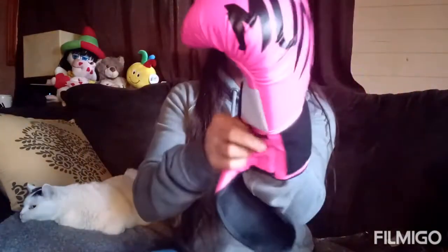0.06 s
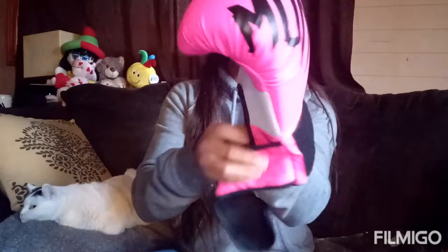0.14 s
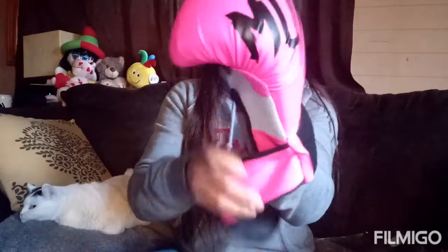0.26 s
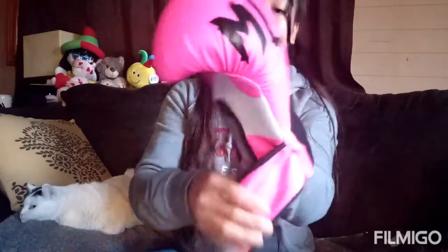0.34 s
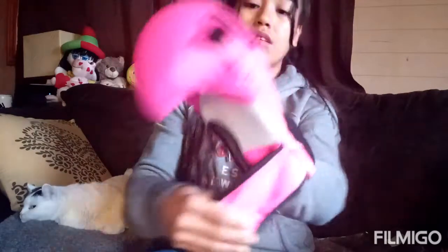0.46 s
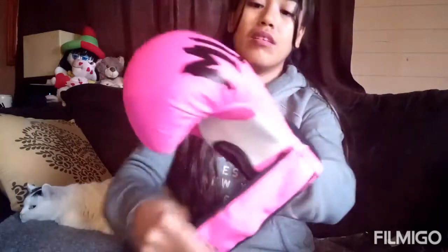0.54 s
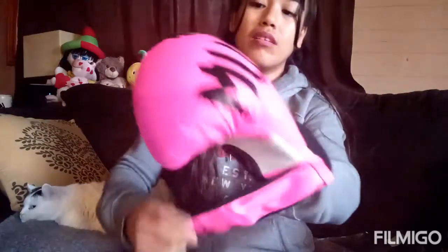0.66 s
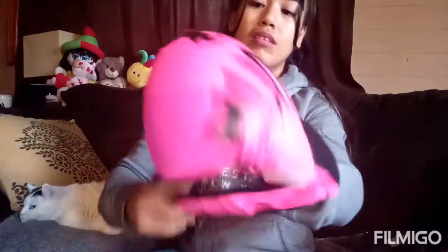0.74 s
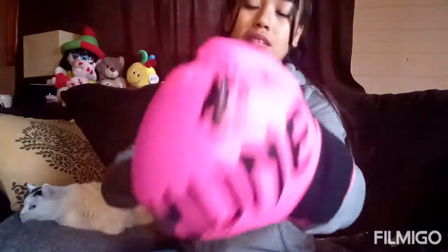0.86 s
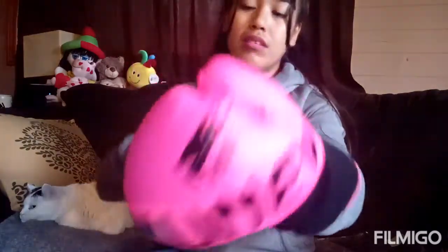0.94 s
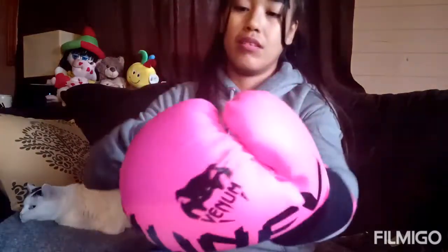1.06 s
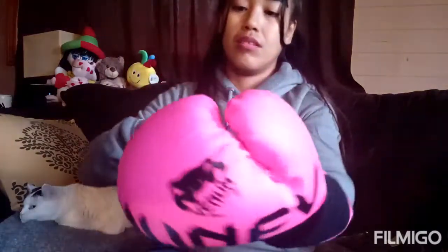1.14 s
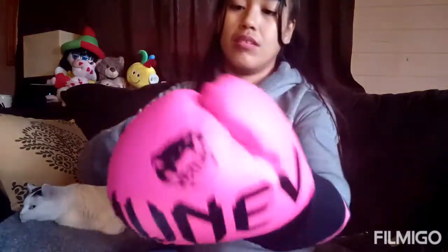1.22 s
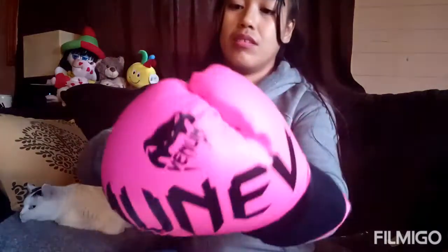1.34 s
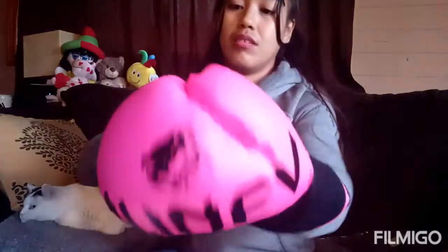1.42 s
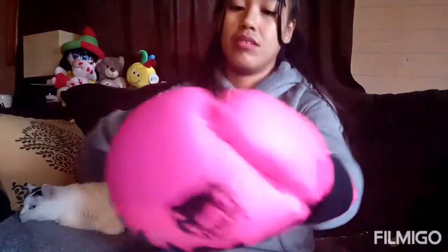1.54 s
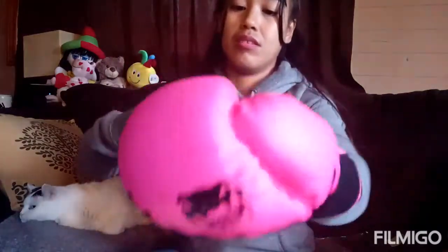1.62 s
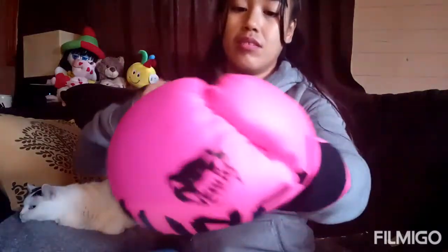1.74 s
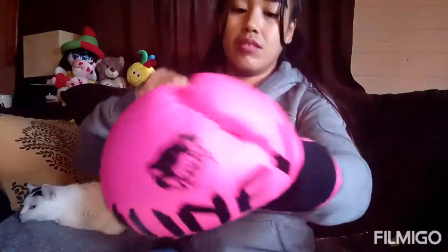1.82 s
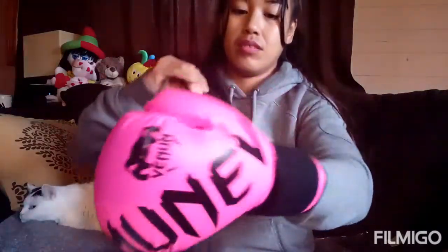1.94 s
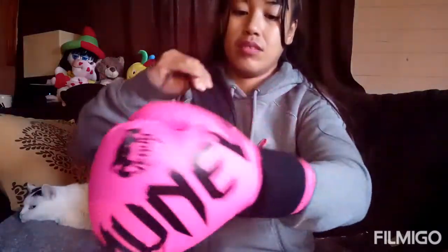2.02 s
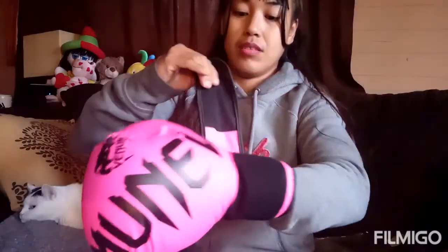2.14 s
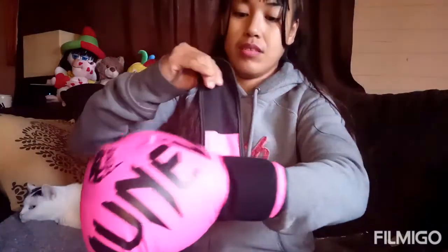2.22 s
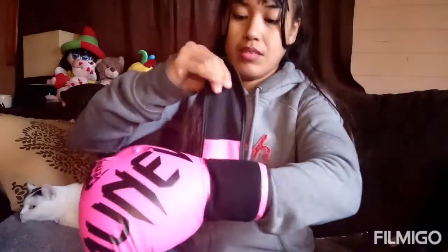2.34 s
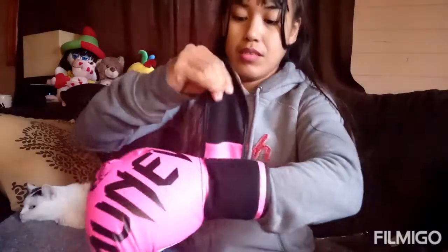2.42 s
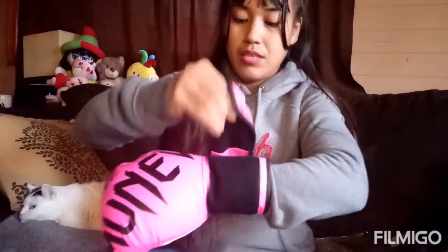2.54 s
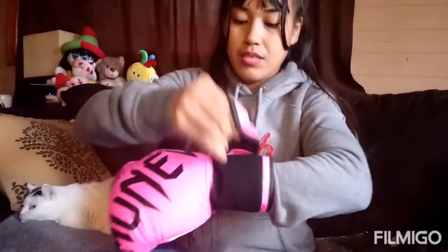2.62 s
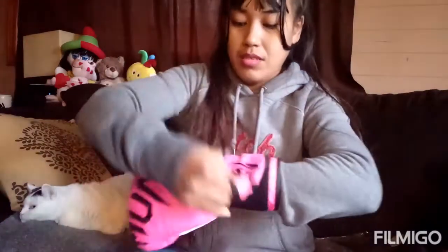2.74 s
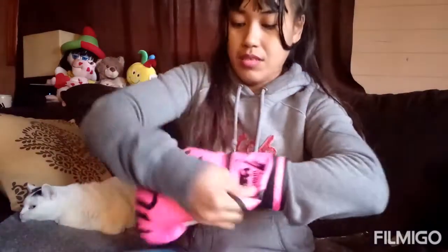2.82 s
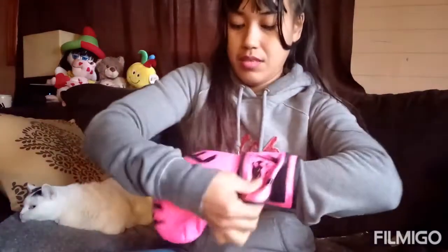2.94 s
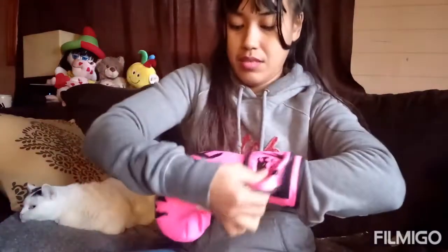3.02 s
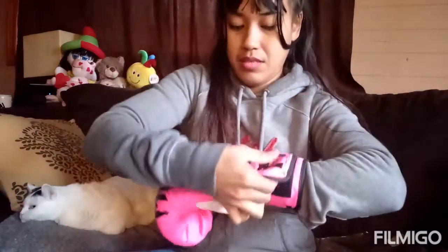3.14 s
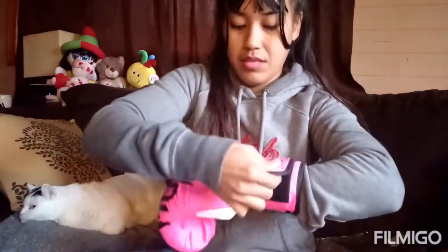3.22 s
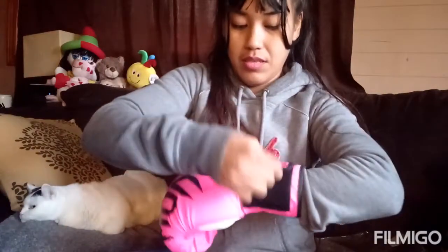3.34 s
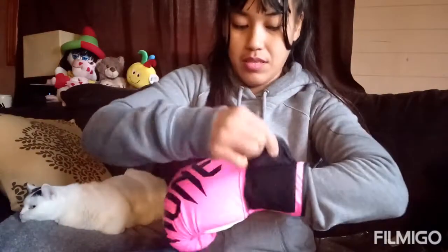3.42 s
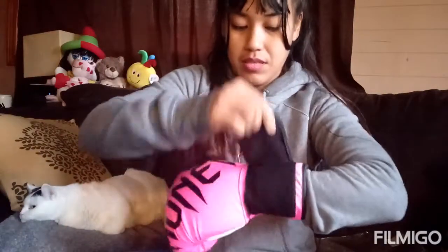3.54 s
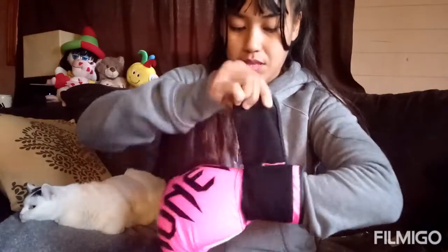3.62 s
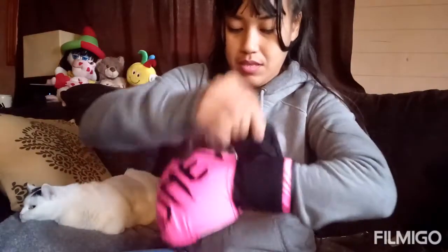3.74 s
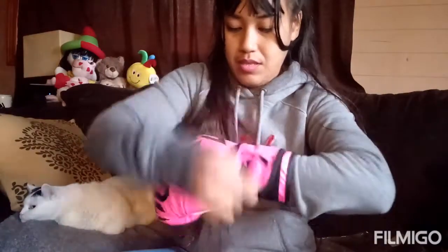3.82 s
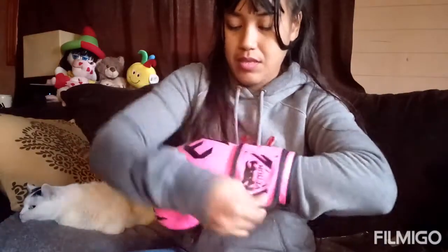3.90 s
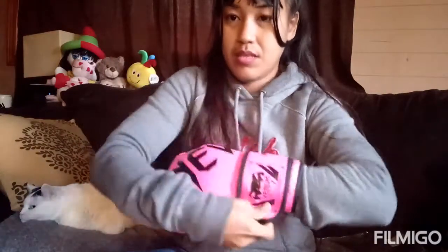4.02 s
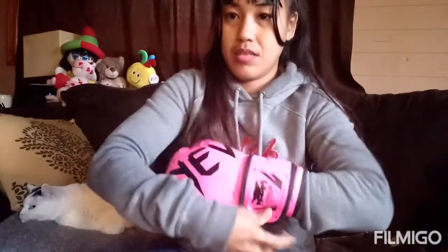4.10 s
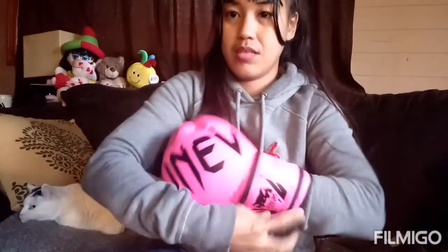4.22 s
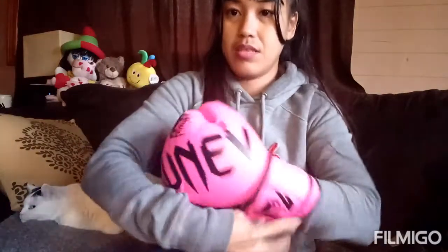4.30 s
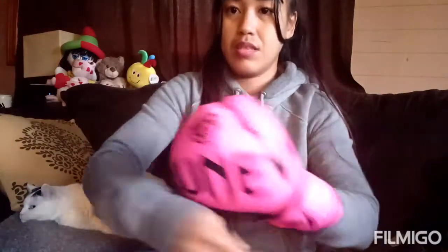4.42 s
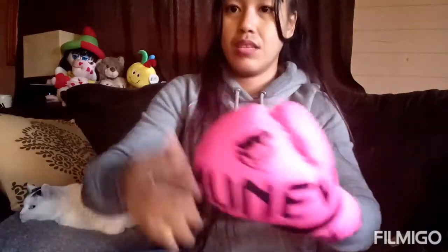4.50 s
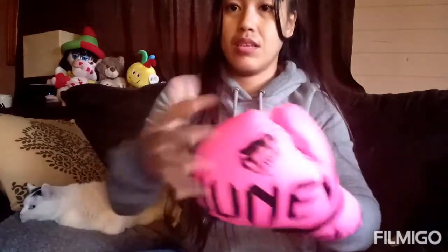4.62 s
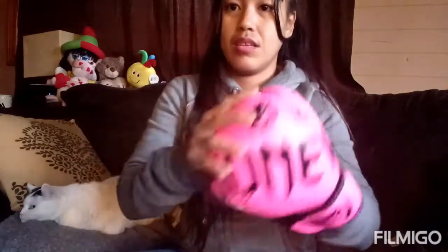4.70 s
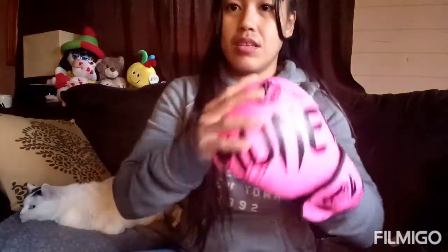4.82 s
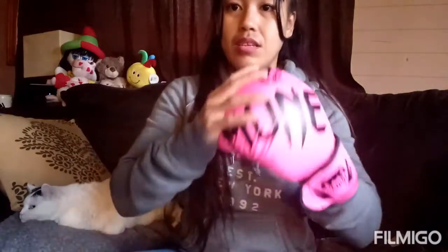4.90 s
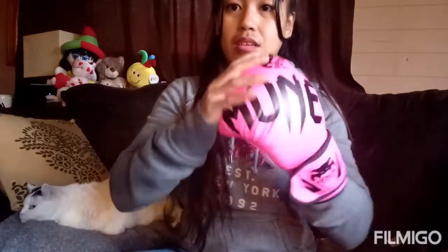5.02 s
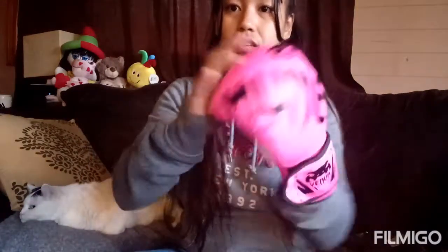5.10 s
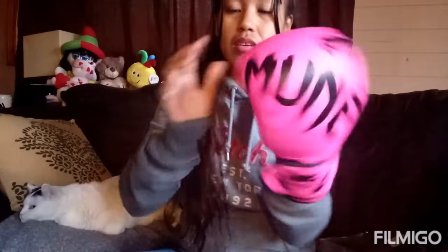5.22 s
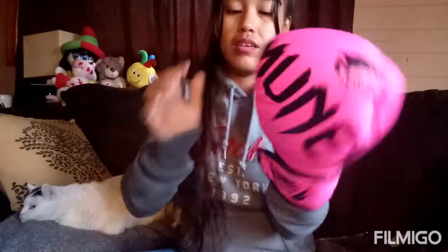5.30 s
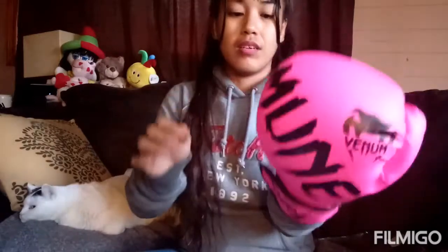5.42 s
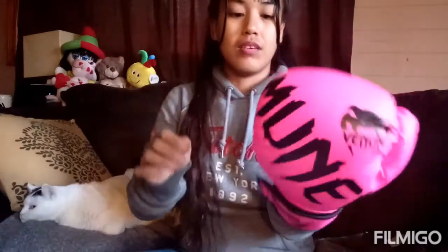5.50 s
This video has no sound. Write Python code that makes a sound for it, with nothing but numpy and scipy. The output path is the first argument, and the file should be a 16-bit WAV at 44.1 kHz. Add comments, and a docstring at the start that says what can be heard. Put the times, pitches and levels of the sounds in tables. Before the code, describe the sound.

A hook-and-loop glove strap snaps loose, rips open loudly with a coarse crackle, then a palm slaps the padded glove in a small quiet room.

```python
"""A small room: a padded boxing glove is pulled on; lining and sleeve rustle, the vinyl shell creaks.
The hook-and-loop wrist strap is tugged, snaps loose in a few places, rips open and is pressed shut.
Then the free hand slaps the padding and taps the shell.
Cloth and hooks are filtered random clicks; snaps and knocks are short bursts ringing their material;
the boom and cuff are decaying sinusoids. A faint room tone lies underneath."""
import sys
import numpy as np
from scipy import signal
from scipy.fft import rfft, irfft
from scipy.io import wavfile
from scipy.ndimage import uniform_filter1d

SR = 44100
rng = np.random.default_rng(int(sys.argv[2]) if len(sys.argv) > 2 else 0)


def inscribe(sig):
    """Save sig as 16-bit PCM at rate SR to the path in sys.argv[1].

    A 1-D sig is mono; a 2-D sig holds one channel per row.
    Samples are clipped to [-1, 1] before scaling.
    """
    pcm = np.round(np.clip(np.atleast_2d(sig).T, -1, 1) * 32767)
    wavfile.write(sys.argv[1], SR, pcm.astype(np.int16))


N = 245195
TIME_S = np.arange(N) / SR

# Spectra: [freq_hz, gain_db]
ROOM_TONE_SPECTRUM = [(24, -91.5), (40, -52), (235, -12), (273, -8.5), (484, -12.5), (15500, -32)]
CLOTH_SPECTRUM = [(200, -39), (750, -16.5), (1100, -18.5), (1550, 0.5), (2000, -8.5), (2800, -2.5),
                  (4600, 0.5), (8400, -9.5), (15500, -9.5)]
PADDING_SPECTRUM = [(40, -23.5), (170, -22.5), (340, -2), (850, -0.5), (1600, -7.5), (5000, -29.5)]
FIZZ_SPECTRUM = [(1000, -48), (5000, -5), (9000, -2.5), (12000, 4.5), (15500, -0.5)]
TICK_SPECTRUM = [(200, -50), (2000, 1), (4500, -3.5), (8000, -3), (15500, -15.5)]
BUMP_SPECTRUM = [(60, -49), (150, -18), (320, -5), (850, -3.5), (1600, -6.5), (5000, -19.5)]
SLAP_SPECTRUM = [(80, -18.5), (160, 2), (700, -0.5), (2500, -6), (4500, -3), (9000, -14), (15500, -14)]
SNAP_SPECTRUM = [(110, -39), (300, -19), (750, 0), (1700, 2.5), (4000, -2), (8000, -17.5), (15500, -27)]
STRAP_SPECTRUM = [(110, -52), (190, -30), (320, -1), (540, -7), (780, 1.5), (1300, 1), (2400, -0.5),
                  (4400, 0), (8600, -8), (12000, -6), (15500, -8.5)]
# Strap resonances: [freq_hz, width_hz, lift_db]
STRAP_MODES = [(455, 100, 6), (776, 200, 3), (4200, 520, 3.5)]
# Room decay: [freq_hz, t60_s]
ROOM_DECAY = [(200, 0.2), (600, 0.19), (4000, 0.23)]
# Faint rustle of the arms between strokes, until they rest: [time_s, level_db]
ARM_STIRRING = [(0, -55.5), (.09, -70.5), (1.1, -60.5), (2.1, -66), (2.75, -62), (4.5, -65), (4.63, -79),
                (4.85, -65), (5.56, -82)]
# Strokes of sleeve and lining, hardest where the hand is shoved in; levels ahead of the layer trims:
# [start_s, length_s, hiss_db, padding_db, fizz_db]
CLOTH_STROKES = [(0.121, .2, -53.5, -68.5, -66), (0.392, 0.1, -54.5, -64, -59.5),
                 (0.526, 0.12, -37, -50, -66), (0.686, 0.084, -48.5, -93, -73),
                 (1.118, 0.21, -57.5, -63, -74), (1.357, 0.052, -51, -64, -64),
                 (1.495, 0.22, -65, -69, -78), (1.8, 0.11, -59.5, -68, -59), (2.241, 0.13, -58.5, -93, -63),
                 (2.477, 0.11, -59.5, -69, -66), (3.769, 0.383, -55, -61.5, -64),
                 (3.985, 0.047, -47.5, -54, -57), (4.163, 0.25, -58, -60.5, -80),
                 (5.047, 0.12, -58, -68, -78), (5.409, 0.13, -66, -59.5, -73)]
# Skin drags over vinyl: [start_s, length_s, level_db, pitch_hz]
SKIN_RUBS = [(0.362, 0.2, -63.5, 1300), (0.553, 0.12, -48.5, 1950), (0.993, 0.098, -66.5, 670),
             (1.133, 0.21, -66, 1140), (2.272, 0.075, -60.5, 3240), (3.85, 0.12, -58, 1080),
             (4.014, 0.02, -49, 1420), (4.016, 0.025, -51, 3500), (4.13, 0.35, -67.5, 404),
             (4.231, 0.033, -48.5, 2250), (4.258, 0.06, -60.5, 950)]
# Larger vinyl creases and stray hooks: [start_s, peak_db, ring_hz]
TICK_EVENTS = [(0.4303, -35, 1430), (1.2166, -31, 2970), (2.2588, -38, 3700), (3.849, -36.5, 1360),
               (3.8807, -32.5, 2120), (3.9302, -34, 4070), (3.9542, -33.5, 1640), (3.9742, -35.5, 3040),
               (4.1459, -34.5, 4840), (4.2032, -39, 5470), (4.3005, -38.5, 4020), (4.3598, -39.5, 4100),
               (4.3958, -31, 4170), (5.082, -42, 4000), (5.451, -44, 4960), (5.4727, -38.5, 4300)]
# Dull knocks into the padding: [start_s, peak_db, pitch_hz]
PADDING_BUMPS = [(0.845, -48, 330), (0.986, -46.5, 750), (1.299, -36.5, 556), (3.847, -40, 337),
                 (3.952, -38, 321), (4.711, -39, 340), (5.003, -36, 774), (5.142, -50, 300),
                 (5.542, -51, 450)]
# Stiff cuff is jerked: [start_s, peak_db]
CUFF_KNOCKS = [(2.7865, -33.5), (2.8335, -24.5), (2.9887, -32), (3.005, -32.5)]
# Strap yanks the glove, a deep shove of air: [start_s, gain_db]
GLOVE_YANKS = [(3.356, -45), (3.555, -41), (3.63, -44.5)]
# Palm lands in three quick contacts: [start_s, peak_db, ring_hz]
PALM_CONTACTS = [(4.699, -25.5, 4260), (4.706, -25, 2050), (4.7112, -20.5, 4400)]
# Boom of the air-filled padding, ahead of its swell: [pitch_hz, level_db, t60_s]
PADDING_BOOM = [(149, -33, 0.057), (287, -16.5, 0.043), (351, -18.5, 0.041)]
# Snaps of the taut strap, and last a fingertip on the shell: [start_s, peak_db, ring_hz]
STRAP_SNAPS = [(2.8335, -16.5, 3330), (2.9693, -25.5, 2870), (2.9887, -27, 1100), (2.9982, -18.5, 1670),
               (3.0313, -26, 4300), (3.085, -15, 1980), (3.1995, -13.5, 1400), (3.2071, -13.5, 1450),
               (3.2158, -20.5, 1457), (3.2173, -19, 2130), (5.0034, -22.5, 1280)]
# Hooks creak at each tug: [start_s, length_s, level_db]
STRAP_TUGS = [(2.775, 0.15, -48.5), (2.925, 0.1, -44.5), (3.08, 0.029, -46), (3.195, 0.016, -35.5)]
# Pull on the strap as it peels open: [time_s, level_db]
PEEL_PULL = [(3.345, -43.5), (3.384, -29.5), (3.414, -20.5), (3.44, -26), (3.495, -20.5), (3.525, -26),
             (3.6, -28.5), (3.666, -20), (3.729, -53.5)]
# Strap catches, then a strong row of hooks gives way and the freed piece flaps:
# [start_s, peak_db, flap_hz]
STRAP_CATCHES = [(3.333, -17, 1100), (3.35, -13, 900), (3.3546, -10.5, 2690), (3.386, -11.5, 2980),
                 (3.4008, -12, 4130), (3.421, -11, 1130), (3.4738, -10.5, 4130), (3.486, -12.5, 760),
                 (3.514, -16.5, 2000), (3.5415, -9.5, 3980), (3.5655, -13, 3440), (3.608, -12, 2010),
                 (3.628, -10.5, 3060), (3.6461, -10.5, 1070), (3.663, -16, 2900), (3.6775, -12.5, 3000)]

ROOM_TONE_DB = -74
ATTACK_S, RELEASE_S, SAG_DB_PER_S = 0.06, 0.021, 14.5  # stroke gathers speed, slackens; sags from its start
STIR_PADDING_DB = -13  # padding re the arm rustle
STIR_SWAY_DB, STIR_SWAY_PER_S = 2.2, 16
HISS_TRIM_DB, PADDING_TRIM_DB = -1.6, -5.5
RING_WIDTH = 0.55  # fraction of ring_hz
CREASES_PER_S, CREASE_DB = 34, 12  # CREASE_DB: above the slide gain
CREASE_SCATTER_DB, CREASE_MAX_DB, CREASE_HZ = 2.5, -44, (3000, 8000)
CUFF_HZ, CUFF_T60_S = 790, 0.018
YANK_S = 0.0027
SWELL_S, BOOM_LAG_S = 0.0079, 0.0052  # padding compresses; lag after first palm contact
SNAP_DECAY_S, SNAP_RING_DB = 0.0007, 3.5
TUG_ATTACK_S = 0.012
STALL_S, STALL_DB = 0.012, -7
STICK_SLIP_DB, HOOKS_TRIM_DB = 3.2, -4
MODE_WANDER, FLEX_PER_S = 0.09, 25  # MODE_WANDER: rms of log frequency
CATCH_DECAY_S, ROW_DECAY_S = 0.0015, 0.0006
ROWS_PER_S, ROW_OVER_PEEL_DB, ROW_SCATTER_DB = 190, 14, 3
ROW_JITTER, ROW_FLAP_HZ = 0.45, (600, 5200)  # ROW_JITTER: fraction of the row interval
FLAP_WIDTH, FLAP_DB = 0.35, 9  # FLAP_WIDTH: fraction of flap_hz
ROOM_SHIFT_HZ, TAIL_DB = 2.5, -6.0
REFLECTION_S, REFLECTION_DB = 0.0075, -24.0
CEILING, BASS_CUT_HZ, EDGE_HZ = 0.45, 90, 16050


def amp(db):
    """Decibels to linear gain."""
    return 10 ** (np.asarray(db) / 20)


def unit(x):
    """Scale to rms 1."""
    return x / np.sqrt(np.mean(x ** 2) + 1e-20)


def read(points, hz):
    """Interpolate [freq_hz, value] on a log-frequency axis."""
    table_hz, value = np.transpose(points)
    return np.interp(np.log(hz + 1), np.log(table_hz + 1), value)


def level(rows):
    """Gain over time from [time_s, level_db]; -140 dB outside."""
    return amp(np.interp(TIME_S, *np.transpose(rows), left=-140, right=-140))


def add(mix, start_s, sound):
    """Add a sound in place, cut at the end of the mix."""
    part = mix[max(round(start_s * SR), 0):][:len(sound)]
    part += sound[:len(part)]


def colour(x, spectrum, modes=(), size=2048):
    """Minimum-phase filter: smooth spectrum plus resonances [freq_hz, width_hz, lift_db]."""
    hz = np.fft.rfftfreq(size, 1 / SR)
    db = read(spectrum, hz)
    for mode_hz, width_hz, lift_db in modes:
        db = db + lift_db / (1 + (2 * (hz - mode_hz) / width_hz) ** 2)
    log_gain = np.log(amp(np.r_[db, db[-2:0:-1]]))
    response = np.fft.ifft(np.exp(np.conj(signal.hilbert(log_gain)))).real
    return signal.oaconvolve(x, response)[:len(x)]


def wobble(per_s):
    """Random wander of rms 1, per_s new targets a second."""
    return unit(np.interp(TIME_S * per_s, np.arange(8000), rng.standard_normal(8000)))


def crackle(per_s, spread_db):
    """Fibres letting go: random clicks, a few much larger than the rest."""
    size = amp(spread_db * np.minimum(rng.exponential(1, N), 4))
    sign = rng.choice([-1, 1], N)
    return size * sign * (rng.random(N) < per_s / SR)


def shifting(x, depth_db):
    """Random time-frequency patches vary the colour of the sound."""
    bins = signal.stft(x, nperseg=512, noverlap=384)[2]
    patches = uniform_filter1d(rng.standard_normal(bins.shape), size=7, axis=0)
    patches = uniform_filter1d(patches, size=14, axis=1)
    return signal.istft(bins * amp(depth_db * unit(patches)), nperseg=512, noverlap=384)[1][:N]


def strokes(rows, attack_s):
    """Gain over time from [start_s, length_s, level_db]: attack, sagging hold, release."""
    power = np.zeros(N)
    for start_s, length_s, db in rows:
        t = np.maximum(TIME_S - start_s, 0)
        rise = np.sin(np.pi / 2 * np.minimum(t / attack_s, 1)) ** 2
        release = np.exp(-np.maximum(t - length_s, 0) / RELEASE_S)
        power += (rise * amp(db - SAG_DB_PER_S * t) * release) ** 2
    return np.sqrt(power)


def burst(decay_s, size=4096):
    """Dense volley of tiny releases: fast swell, decay, evened spectrum."""
    u = np.arange(1, size + 1) / SR / decay_s
    bins = rfft(rng.standard_normal(size) * u ** 0.5 * np.exp(-u))
    return irfft(bins / abs(bins) ** 0.5)[:size // 2]


def pop(spectrum, modes, decay_s):
    """One release ringing its material, peak near 1."""
    sound = colour(burst(decay_s), spectrum, modes)
    return 0.5 * sound / np.sqrt(np.sum(sound ** 2) / (decay_s * SR))


def clicks(rows, spectrum, decay_s, ring_db):
    """Each click broadly rings the patch of material where it happens."""
    out = np.zeros(N)
    for start_s, peak_db, ring_hz in rows:
        ring = [(ring_hz, RING_WIDTH * ring_hz, ring_db)]
        add(out, start_s, amp(peak_db) * pop(spectrum, ring, decay_s))
    return out


def room_tone():
    """Steady noise with the colour of the quiet room."""
    return amp(ROOM_TONE_DB) * unit(colour(rng.standard_normal(N), ROOM_TONE_SPECTRUM))


def handling():
    """Gains over time of sliding cloth, rubbed padding and loose fibres."""
    stir = level(ARM_STIRRING) * amp(STIR_SWAY_DB * wobble(STIR_SWAY_PER_S))
    rows = np.array(CLOTH_STROKES)
    slide, press, fibres = (strokes(rows[:, [0, 1, column]], ATTACK_S) for column in (2, 3, 4))
    return np.hypot(slide, stir), np.hypot(press, amp(STIR_PADDING_DB) * stir), fibres


def rustle(slide, press, fibres):
    """Sleeve and lining: grainy hiss and fine fizz over hollow rubbing of the padding."""
    hiss = shifting(colour(crackle(per_s=9000, spread_db=1.5), CLOTH_SPECTRUM), depth_db=2.5)
    hollow = shifting(colour(crackle(per_s=2700, spread_db=4), PADDING_SPECTRUM), depth_db=3.5)
    fizz = colour(crackle(per_s=5800, spread_db=6.5), FIZZ_SPECTRUM)
    grip = amp(1.5 * wobble(per_s=90))
    cloth = amp(HISS_TRIM_DB) * unit(hiss * grip) * slide
    padding = amp(PADDING_TRIM_DB) * unit(hollow * grip ** 2) * press
    return cloth + padding + unit(fizz * grip) * fibres


def creases(slide):
    """Small vinyl folds tick at random, louder while the glove is moved."""
    when, size, pitch = rng.random((int(CREASES_PER_S * N / SR), 3)).T
    start_s = when * N / SR
    slide_db = 20 * np.log10(np.interp(start_s, TIME_S, slide) + 1e-9)
    peak_db = slide_db + CREASE_DB - CREASE_SCATTER_DB * np.log(size)
    ring_hz = np.interp(pitch, [0, 1], CREASE_HZ)
    rows = zip(start_s, np.minimum(peak_db, CREASE_MAX_DB), ring_hz)
    return clicks(rows, TICK_SPECTRUM, decay_s=0.0007, ring_db=10)


def rubs():
    """Tiny uneven slips of skin excite a broad resonance of the shell."""
    out, slips = np.zeros(N), crackle(per_s=1800, spread_db=4)
    for start_s, length_s, level_db, pitch_hz in SKIN_RUBS:
        part = slips[round(start_s * SR):][:int(length_s * SR)]
        sound = unit(signal.lfilter(*signal.iirpeak(pitch_hz, 3.5, fs=SR), part))
        add(out, start_s, amp(level_db) * sound * signal.windows.tukey(len(sound), 0.6))
    return out


def ticks():
    """Large creases and stray hooks release in short, strongly ringing clicks."""
    return clicks(TICK_EVENTS, TICK_SPECTRUM, decay_s=0.00088, ring_db=20.0)


def bumps():
    """Soft padding rings dully under longer bursts."""
    return clicks(PADDING_BUMPS, BUMP_SPECTRUM, decay_s=0.0076, ring_db=15.0)


def knocks():
    """The cuff rings with one short hollow note."""
    out, t = np.zeros(N), TIME_S[:SR // 8]
    for start_s, peak_db in CUFF_KNOCKS:
        add(out, start_s, amp(peak_db - 60 * t / CUFF_T60_S) * np.cos(2 * np.pi * CUFF_HZ * t))
    return out


def yanks():
    """The whole glove jerks: one slow swing of pressure."""
    out, u = np.zeros(N), TIME_S[:SR // 8] / YANK_S
    for start_s, gain_db in GLOVE_YANKS:
        add(out, start_s, amp(gain_db) * u * (2 - u) * np.exp(-u))
    return out


def slap():
    """Skin smacks the vinyl while the padding swells into a short boom."""
    out = clicks(PALM_CONTACTS, SLAP_SPECTRUM, decay_s=0.0019, ring_db=-0.5)
    t = TIME_S[:SR // 4]
    boom = sum(amp(db - 60 * t / t60_s) * np.sin(2 * np.pi * hz * t) for hz, db, t60_s in PADDING_BOOM)
    swell = 1 - np.exp(-(t / SWELL_S) ** 2)
    add(out, PALM_CONTACTS[0][0] + BOOM_LAG_S, boom * swell)
    return out


def snaps():
    """Sharp releases ring the taut strap; the last is a fingertip on the shell."""
    return clicks(STRAP_SNAPS, SNAP_SPECTRUM, SNAP_DECAY_S, SNAP_RING_DB)


def peeling():
    """Peel gain: follows the pull, stalls just before each catch gives way."""
    caught = sum(np.exp(-((TIME_S - s) / STALL_S) ** 4) * (TIME_S < s) for s, _, _ in STRAP_CATCHES)
    return level(PEEL_PULL) * amp(STALL_DB * np.minimum(caught, 1))


def rows_of_hooks(peel):
    """Row after row lets go, as strongly as it is pulled: [start_s, peak_db, flap_hz]."""
    even_s = np.arange(PEEL_PULL[0][0], PEEL_PULL[-1][0], 1 / ROWS_PER_S)
    shift, size, pitch = rng.uniform(-1, 1, (len(even_s), 3)).T
    start_s = even_s + ROW_JITTER * shift / ROWS_PER_S
    peel_db = 20 * np.log10(np.interp(start_s, TIME_S, peel))
    peak_db = peel_db + ROW_OVER_PEEL_DB + ROW_SCATTER_DB * size
    flap_hz = np.exp(np.interp(pitch, [-1, 1], np.log(ROW_FLAP_HZ)))
    return list(zip(start_s, peak_db, flap_hz))


def rip():
    """Hooks pop singly and in rows; the bending strap retunes its resonances from row to row."""
    out, peel = np.zeros(N), peeling()
    hooks = crackle(per_s=3200, spread_db=2.2) * amp(STICK_SLIP_DB * wobble(per_s=450))
    hooks = unit(shifting(colour(hooks, STRAP_SPECTRUM), depth_db=3))
    creak = unit(colour(crackle(per_s=1100, spread_db=2.8), STRAP_SPECTRUM))
    flex = np.exp(MODE_WANDER * wobble(FLEX_PER_S))
    for rows, decay_s in (STRAP_CATCHES, CATCH_DECAY_S), (rows_of_hooks(peel), ROW_DECAY_S):
        for start_s, peak_db, flap_hz in rows:
            bend = np.interp(start_s, TIME_S, flex)
            modes = [(hz * bend, width_hz, lift_db) for hz, width_hz, lift_db in STRAP_MODES]
            modes.append((flap_hz, FLAP_WIDTH * flap_hz, FLAP_DB))
            add(out, start_s, amp(peak_db) * pop(STRAP_SPECTRUM, modes, decay_s))
    return out + amp(HOOKS_TRIM_DB) * hooks * peel + creak * strokes(STRAP_TUGS, TUG_ATTACK_S)


def tail(size=22050):
    """Dense reflections of random sign, each band dying at its own speed; energy 1."""
    fade_in = np.clip((TIME_S[:size] - 0.005) / 0.003, 0, 1)
    taps = rng.choice([-1., 1.], size) * (rng.random(size) < 5000 / SR) * fade_in
    hz, at_s, bins = signal.stft(taps, SR, nperseg=256)
    decay = amp(-60 * at_s / read(ROOM_DECAY, hz)[:, None])
    response = signal.istft(bins * decay, SR)[1][:size]
    return response / np.linalg.norm(response)


def room(x):
    """Small furnished room: one near reflection, and two short tails fed in quadrature rotation."""
    phase = 2 * np.pi * ROOM_SHIFT_HZ * TIME_S
    wet = sum(signal.fftconvolve(x * share, tail())[:N] for share in (np.cos(phase), np.sin(phase)))
    out = x + amp(TAIL_DB) * wet
    add(out, REFLECTION_S, amp(REFLECTION_DB) * x)
    return out


def scene():
    """Glove and strap sound in the room, over the room tone."""
    tone = room_tone()
    slide, press, fibres = handling()
    cloth = rustle(slide, press, fibres)
    shell = creases(slide) + rubs() + ticks()
    impacts = bumps() + knocks() + yanks() + slap()
    strap = snaps() + rip()
    return (room(cloth + shell + impacts + strap) + tone)[None]


def record(dry):
    """Small microphone: rounds the highest peaks, sheds deep bass, then the band limit."""
    rounded = CEILING * np.tanh(dry / CEILING)
    thin = signal.sosfilt(signal.butter(1, BASS_CUT_HZ, "high", fs=SR, output="sos"), rounded)
    band_limit = signal.firwin(511, EDGE_HZ, window=("kaiser", 9), fs=SR)
    return signal.oaconvolve(thin, band_limit[None], "same")


dry = scene()
out = record(dry)
inscribe(out)
```